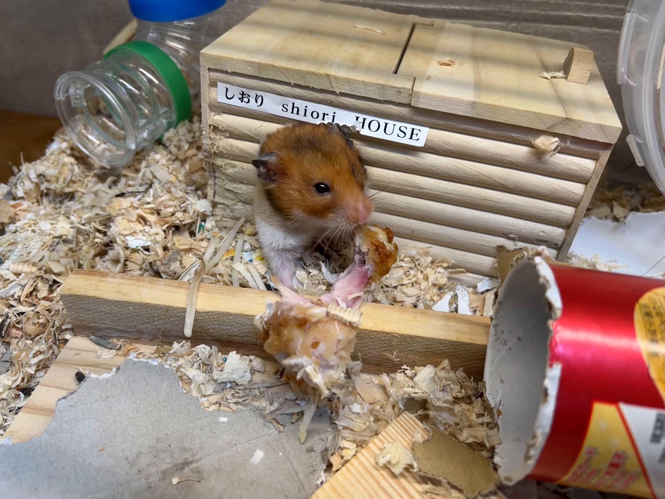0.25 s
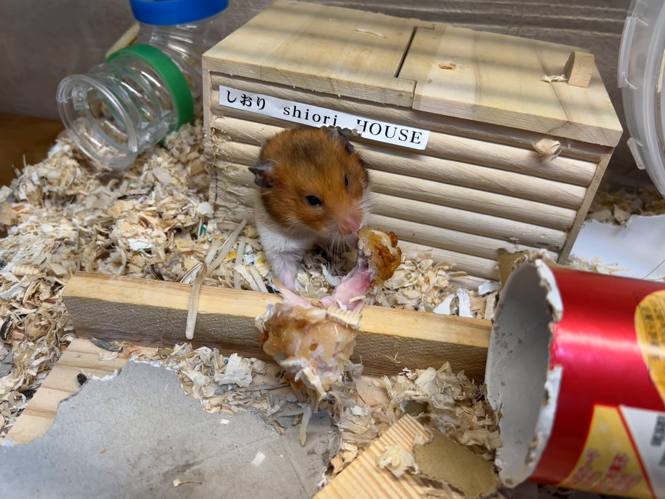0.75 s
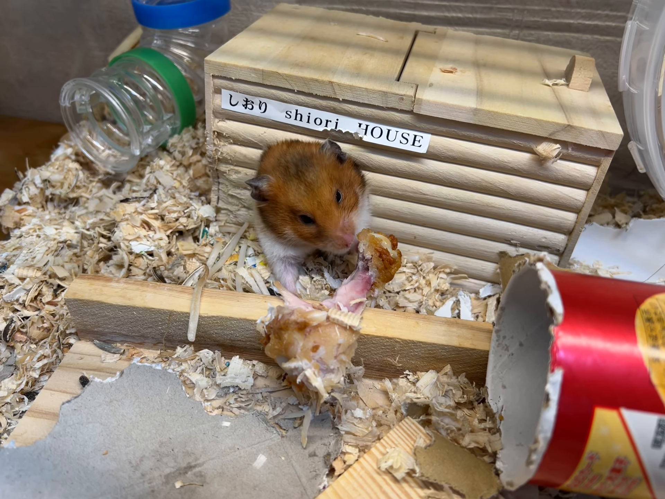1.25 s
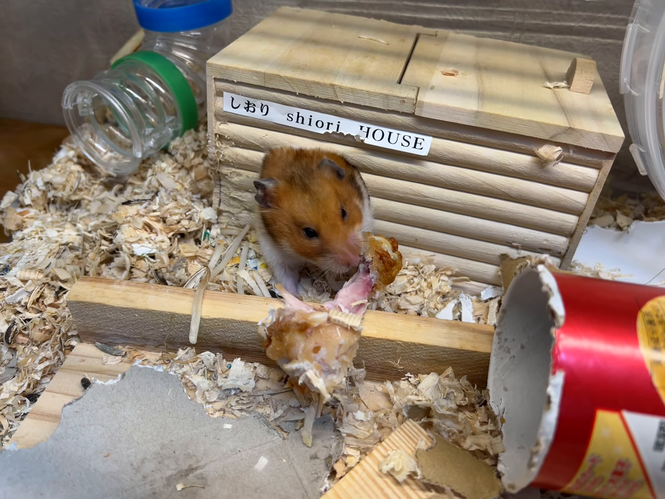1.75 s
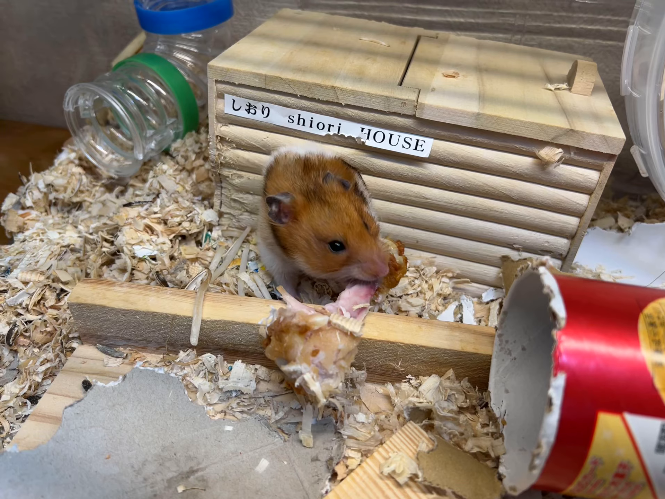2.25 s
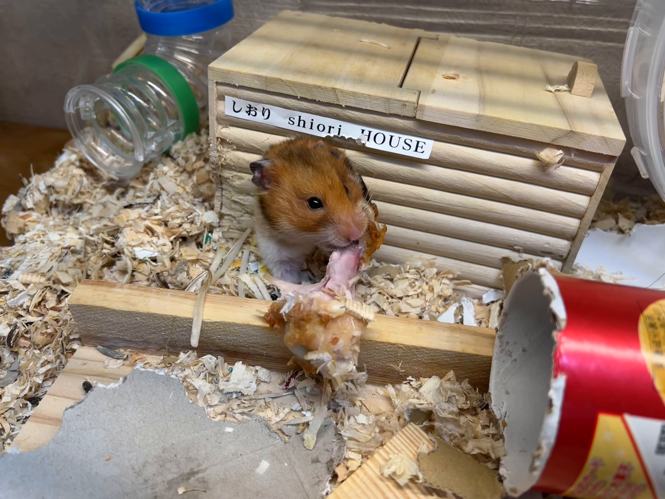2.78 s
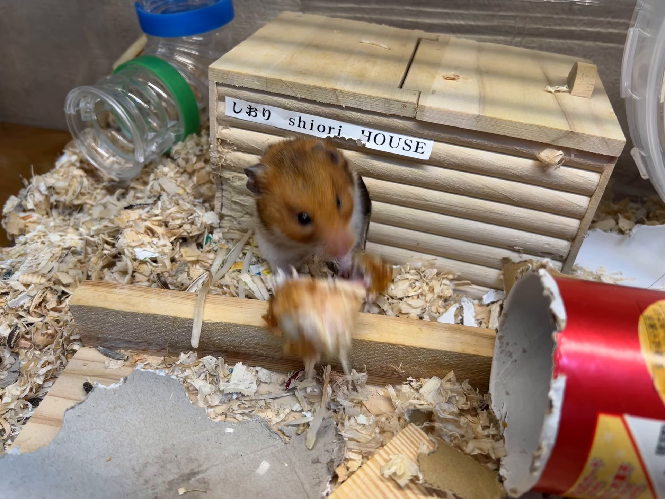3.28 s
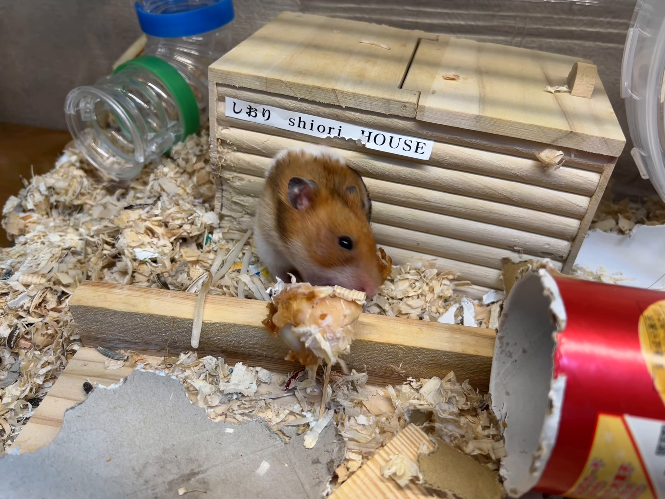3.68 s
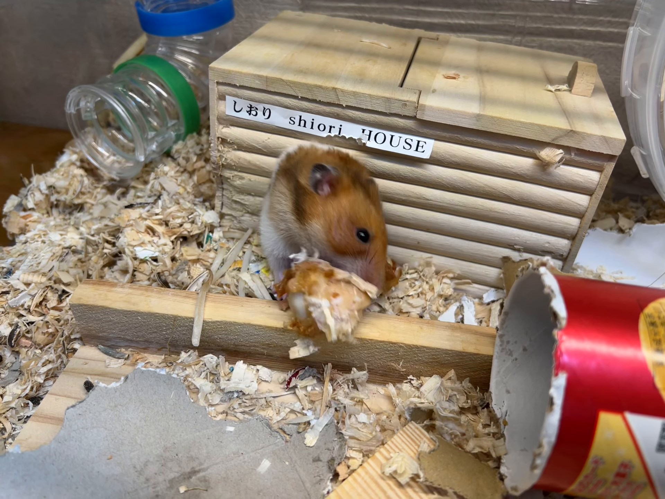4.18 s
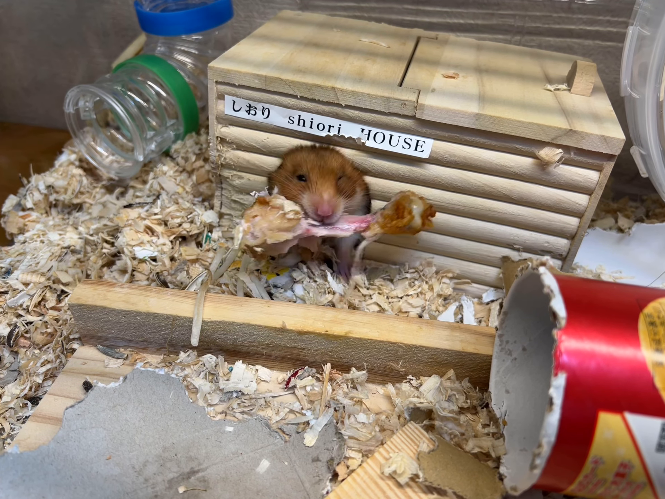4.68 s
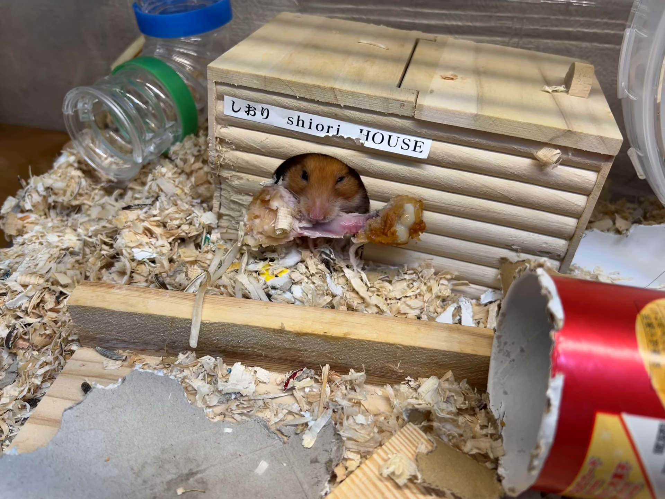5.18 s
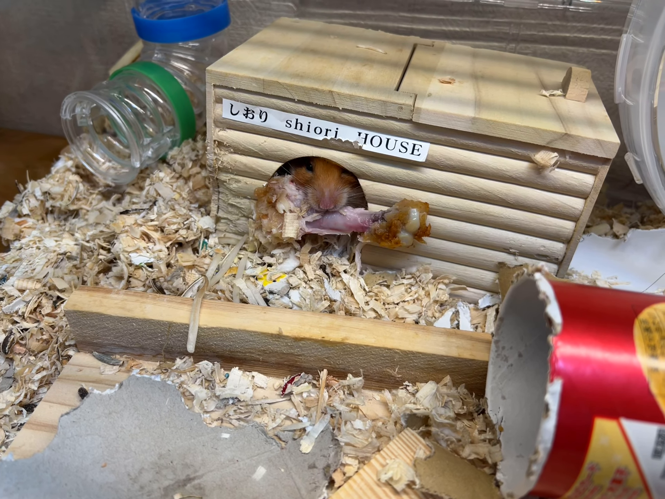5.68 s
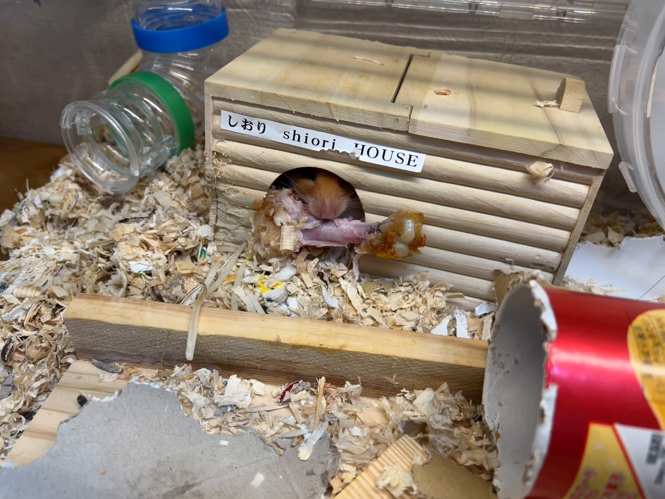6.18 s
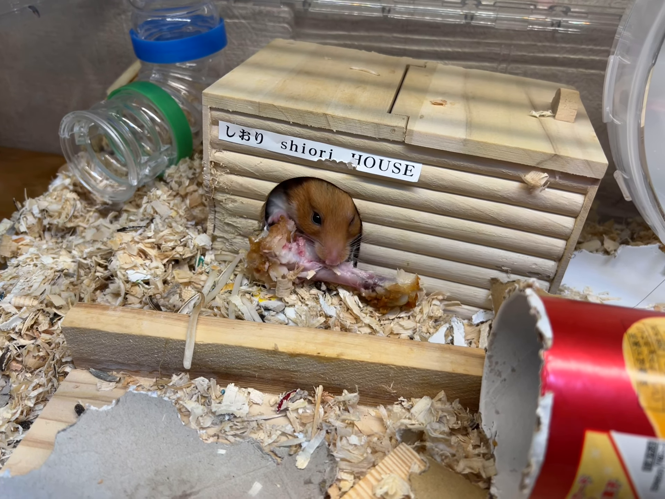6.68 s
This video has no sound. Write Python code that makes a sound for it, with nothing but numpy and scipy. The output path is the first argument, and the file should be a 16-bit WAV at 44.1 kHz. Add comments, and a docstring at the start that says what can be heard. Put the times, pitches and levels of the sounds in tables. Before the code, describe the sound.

A hamster's teeth tick faintly on a bone in a quiet room, then the bone is tugged, rasping and thumping through crackling wood shavings.

```python
"""A hamster nibbles a bone in its cage, then drags it through wood shavings into the door of its wooden house.
First, over a quiet rumbling room, teeth tick in short runs: sharp impulses with a splintering tail.
Then come the tugs: random tiny fractures make shavings crackle and the bone rasp and catch on wood,
while its heavy end thumps the hollow cage floor and knocks on wood, both built from decaying modes.
Near the end it squeaks on the door's rim and knocks again; the cage walls answer closely throughout."""
import sys
import numpy as np
from scipy import signal
from scipy.fft import rfft, irfft, next_fast_len
from scipy.io import wavfile
from scipy.ndimage import uniform_filter1d, map_coordinates

SR = 44100
rng = np.random.default_rng(int(sys.argv[2]) if len(sys.argv) > 2 else 0)


def to_wav(s):
    """Save 16-bit WAV."""
    ch = np.atleast_2d(s).T  # columns
    pcm = np.round(np.clip(ch, -1, 1) * 32767)  # PCM
    wavfile.write(sys.argv[1], SR, pcm.astype(np.int16))


N = 306054  # length of the scene in samples


def amp(db):
    """Decibels to gain."""
    return 10 ** (np.asarray(db) / 20)


def unit(x):
    """Scale to rms 1."""
    return x / np.sqrt(np.mean(x ** 2) + 1e-20)


def blow_unit(x):
    """Scale so that the first thirtieth of a second has rms 1."""
    return x / np.sqrt(np.mean(x[:SR // 30] ** 2) + 1e-20)


def peaked(x):
    """Scale to peak 1."""
    return x / (np.abs(x).max() + 1e-20)


def along(points, hz):
    """Read a curve of (Hz, value) points on a log frequency axis."""
    point_hz, values = np.transpose(points)
    return np.interp(np.log(hz + 1), np.log(point_hz), values)


def wobble(rate):
    """A smooth random curve with rate knots a second."""
    knots = rng.standard_normal(N // 20)
    return map_coordinates(knots, [np.arange(N) * rate / SR], mode="wrap")


def filtered(x, response):
    """Pass x through a response given as a function of frequency in Hz."""
    size = next_fast_len(len(x) + 8192)  # room for the filter's own ringing
    spectrum = rfft(x, size) * response(np.fft.rfftfreq(size, 1 / SR))
    return irfft(spectrum, size)[:len(x)]


def coloured(x, spectrum):
    """Tint x with a (Hz, dB) spectrum, at rms 1."""
    return unit(filtered(x, lambda hz: amp(along(spectrum, hz))))


def resonance(hz, centre, width):
    """Causal response of one damped mode."""
    return 1j * hz * width / (centre ** 2 - hz ** 2 + 1j * hz * width)


MODE_SCATTER_DB = 1.5  # spread of each mode's strength from blow to blow


def ring(modes, t):
    """Struck modes are decaying sines, at slightly new strengths for each blow."""
    total = np.zeros(len(t))
    for hz, db, t60 in modes:
        level_db = db + MODE_SCATTER_DB * rng.standard_normal()
        total += amp(level_db - 60 * t / t60) * np.sin(2 * np.pi * hz * t)
    return total


def grains(size, rate, spread_db):
    """Random tiny fractures, rate a second and of uneven strength, at rms 1."""
    hit = rng.random(size) < rate / SR
    sign = rng.choice([-1, 1], size)
    strength = amp(spread_db * np.clip(rng.standard_normal(size), -2, 2))
    return unit(hit * sign * strength)


def patchy(x, patchy_db):
    """Every chip and contact spot has its own colour: random gains over small patches of pitch and time."""
    z = signal.stft(x, nperseg=256)[2]
    field = uniform_filter1d(rng.standard_normal(z.shape), size=4, axis=0)
    field = uniform_filter1d(field, size=7, axis=1)
    shaded = signal.istft(z * amp(patchy_db * unit(field)), nperseg=256)[1]
    return unit(shaded[:len(x)])


def add(track, s, sound):
    """Mix a sound in at time s."""
    part = track[round(s * SR):][:len(sound)]
    part += sound[:len(part)]


# low rumble of room and cage floor: (f/Hz, level/dB)
RUMBLE_SPECTRUM = [(30, -8), (55, 0), (78, 1), (110, -5), (170, -3), (230, -16.5), (330, -22), (700, -77)]
# faint hiss of the room: (f/Hz, level/dB)
HISS_SPECTRUM = [(160, -18.5), (280, -7.5), (420, -8.5), (520, -10.5), (1050, -16.5), (1900, -17.5),
                 (7000, -29), (16000, -36)]


def room_tone():
    """A low, lumpy rumble and a faint hiss, both shaped noise."""
    lumps = amp(3.2 * np.tanh(wobble(rate=20)))
    rumble = amp(-65.0) * lumps * coloured(rng.standard_normal(N), RUMBLE_SPECTRUM)
    hiss = amp(-78.5) * coloured(rng.standard_normal(N), HISS_SPECTRUM)
    return rumble + hiss


# how long the room's tail lasts: (f/Hz, t60/s)
ROOM_DECAY = [(150, 0.41), (800, 0.17), (3000, 0.099), (14000, 0.2)]


def reflections(x, near_db, near_s, room_db):
    """Dense echoes from the cage walls, and the small room's tail, which fades at its own pace per pitch."""
    hz, t, z = signal.stft(rng.standard_normal(SR // 2), SR, nperseg=256)
    fade = amp(-60 * t / along(ROOM_DECAY, hz)[:, None])
    tail = signal.istft(z * fade, SR, nperseg=256)[1]
    t = np.arange(len(tail)) / SR
    walls = grains(len(t), rate=2000, spread_db=0.0) * np.exp(-t / near_s)
    walls = walls * (t > .002)  # the wall echoes begin after 2 ms
    response = amp(near_db) * walls / np.linalg.norm(walls)
    response = response + amp(room_db) * tail / np.linalg.norm(tail)
    return signal.fftconvolve(x, response)[:N]


# background stirring of the shavings, rising and falling, mostly stronger once the dragging begins: (t/s, level/dB)
STIRRING = [(0, -89.5), (2.15, -91.5), (2.45, -75), (3.2, -85), (4.3, -81.5), (4.7, -73.5), (5.5, -73),
            (5.85, -76), (6.6, -74), (6.94, -74)]
STIR_RASP_DB = -1.5  # rasp on wood over the shavings
# shoves and tugs of the bone: (t/s, length/s, shavings level/dB, rasp on wood over the shavings level/dB)
BONE_TUGS = [(0.008, 0.061, -71.5, -23), (2.515, 0.11, -67.5, -21), (2.594, 0.12, -66.5, 5),
             (2.717, 0.15, -64, 4), (2.933, 0.15, -68.5, 3), (3.235, 0.17, -71.5, -17),
             (3.299, 0.029, -63.5, -20), (3.57, 0.086, -76, -16), (3.72, 0.059, -71, -13),
             (3.894, 0.041, -70, -4), (4.106, 0.023, -58.5, 2), (4.288, 0.074, -78.5, 8),
             (4.431, 0.091, -66.5, 2), (4.48, 0.34, -68, -7), (4.674, 0.092, -62.5, 4.5),
             (4.898, 0.07, -65.5, 3), (4.965, 0.134, -67, 5.5), (5.101, 0.045, -64.5, 10),
             (5.231, 0.11, -65.5, 6), (5.365, 0.048, -66, 2.5), (5.5, 0.1, -76.5, 4),
             (5.584, 0.036, -63.5, 6.5), (5.979, 0.07, -65.5, 6), (6.127, 0.026, -67, 0.5),
             (6.25, 0.072, -68, 6.5), (6.347, 0.082, -64, -2), (6.463, 0.076, -70.5, -11),
             (6.831, 0.072, -66, 10.5)]
TUG_ATTACK_S, TUG_RELEASE_S = 0.037, 0.027


def bed_motion():
    """Gains of rustle and rasp: each tug swells, holds and dies away, adding its power to the stirring."""
    t = np.arange(N) / SR
    shavings_power = amp(np.interp(t, *np.transpose(STIRRING))) ** 2
    rasp_power = shavings_power * amp(STIR_RASP_DB) ** 2
    for s, length, db, wood_db in BONE_TUGS:
        swell = np.clip((t - s) / TUG_ATTACK_S, 0, 1)
        release = np.exp(-np.clip(t - s - length, 0, 1) / TUG_RELEASE_S)
        push = amp(db) * swell * release
        shavings_power = shavings_power + push ** 2
        rasp_power = rasp_power + (amp(wood_db) * push) ** 2
    return np.sqrt(shavings_power), np.sqrt(rasp_power)


def cage_rumble(rasp_gain):
    """Shifting weight makes the cage floor murmur in lumps while the bone is dragged."""
    lumps = amp(3.5 * np.tanh(wobble(rate=22)))
    murmur = unit(lumps * coloured(rng.standard_normal(N), RUMBLE_SPECTRUM))
    return amp(-25.5) * np.sqrt(rasp_gain) * murmur


# a paw taps the wall of the house: time, peak level, pitch, rise time
TAP_S, TAP_DB, TAP_HZ, TAP_RISE_S = 0.97, -56, 320, 0.006


def tap():
    """A padded touch: a few cycles that swell and are damped at once."""
    t = np.maximum(np.arange(N) / SR - TAP_S, 0)
    u = (t / TAP_RISE_S) ** 2
    return amp(TAP_DB) * peaked(u * np.exp(-u) * np.sin(2 * np.pi * TAP_HZ * t))


def chewing():
    """Faint moist crackles in the mouth come and go: uneven grains through a bright resonance."""
    crackle = grains(N, rate=580, spread_db=5.5) * amp(7.8 * np.tanh(wobble(rate=33)))
    return amp(-91.0) * unit(filtered(crackle, lambda hz: resonance(hz, 5870, 4200) ** 2))


# incisors snapping off a fibre: (t/s, peak level/dB, centre f/Hz)
TOOTH_SNAPS = [(0.082, -52, 12900), (0.2362, -60, 6240), (0.815, -52.5, 10800), (1.097, -62, 12800),
               (1.371, -55, 13100), (1.9098, -46.5, 8800), (2.373, -42.5, 13600), (3.09, -51.5, 15300),
               (4.128, -44, 9900), (6.288, -46, 8700)]
# lighter bites in short runs: (t/s)
NIBBLE_TIMES = [0.395, 0.482, 0.569, 0.667, 0.854, 0.941, 1.587, 1.681]
NIBBLE_DB, NIBBLE_SCATTER_DB, NIBBLE_HZ = -66.5, 2, 12000  # peak level, its spread, centre


def teeth():
    """Each snap is one sharp impulse, chased by a few milliseconds of splintering."""
    track, t = np.zeros(N), np.arange(SR // 20) / SR
    nibbles = [(s, NIBBLE_DB + NIBBLE_SCATTER_DB * rng.standard_normal(), NIBBLE_HZ) for s in NIBBLE_TIMES]
    for s, db, centre_hz in [*TOOTH_SNAPS, *nibbles]:
        snap = 1.3 * rng.standard_normal(len(t)) * np.exp(-t / 0.0034)
        snap[0] = 1
        # a broad peak over a little unfiltered click
        snap = filtered(snap, lambda hz: resonance(hz, centre_hz, 10000) ** 2 + 0.0079)
        add(track, s, amp(db) * peaked(snap))
    return track


# weight landing on the cage floor: (t/s, level/dB, centre of the push f/Hz)
FLOOR_THUMPS = [(0.195, -48, 130), (0.99, -61.5, 169), (2.138, -49, 99), (2.288, -45, 133),
                (2.525, -51, 94), (3.283, -21.5, 135), (3.331, -41.5, 222), (3.738, -45.5, 119),
                (3.962, -35.5, 70), (4.132, -36, 97.5), (4.686, -57, 120), (6.754, -52.5, 145),
                (6.877, -37, 74), (6.898, -36.5, 160)]
# hollow cage floor, relaxed and before any foot damps it: (f/Hz, level/dB, t60/s)
CAGE_FLOOR_MODES = [(66.5, -2, 0.32), (84.45, -13.5, 0.72), (106.1, 3.5, 0.15), (123.4, -7.5, 0.63),
                    (133.2, 13.5, 0.059), (154.4, 6, 0.2), (198.2, -6.5, 0.18), (247, -9.5, 0.066),
                    (293, -9.5, 0.16)]
# a light step stays down and damps the floor, a heavy blow lets it ring
STEP_DB, STEP_DAMPING_PER_S, DAMPING_HALVES_DB = -47.5, 5.2, 10  # damping halves every 10 dB louder
# the load stiffens the floor at first (a share of pitch), so its pitch sinks as it relaxes
STIFFENING, RELAX_S = 0.031, 0.12
# the floor's crowded upper modes
SHUDDER_DB, SHUDDER_HZ, SHUDDER_T60_S = -8.5, 218, 0.34


def thumps():
    """Soft, heavy contacts swell into the low modes of the cage floor; a foot left standing there damps them."""
    track, t = np.zeros(N), np.arange(SR) / SR
    sinking = t + STIFFENING * RELAX_S * (1 - np.exp(-t / RELAX_S))  # time runs fast at first
    for s, db, push_hz in FLOOR_THUMPS:
        damping = STEP_DAMPING_PER_S * .5 ** ((db - STEP_DB) / DAMPING_HALVES_DB)
        noise = rng.standard_normal(len(t))
        shudder = unit(filtered(noise, lambda hz: resonance(hz, SHUDDER_HZ, SHUDDER_HZ) ** 2))
        boom = ring(CAGE_FLOOR_MODES, sinking)
        boom = boom + shudder * amp(SHUDDER_DB - 60 * t / SHUDDER_T60_S)
        boom = boom * (1 - np.exp(-(t / 0.006) ** 2)) * np.exp(-damping * t)
        # a padded step barely reaches the upper modes
        softness = 2 + damping / (damping + STEP_DAMPING_PER_S)
        boom = filtered(boom, lambda hz: resonance(hz, push_hz, 1.54 * push_hz) ** softness)
        add(track, s, amp(db) * blow_unit(boom))
    return track


# the bone striking wood: (t/s, body level/dB, hardness f/Hz)
WOOD_KNOCKS = [(3.276, -41.5, 750), (3.945, -56.5, 1210), (3.9541, -37, 4760), (4.329, -62.5, 550),
               (4.688, -56.5, 630), (6.601, -66, 350), (6.869, -44.5, 2830), (6.903, -53.5, 9000),
               (6.925, -56, 5000)]
# wood under the bone: (f/Hz, level/dB, t60/s)
STRUCK_WOOD_MODES = [(306.6, -1.5, 0.13), (437, -3, 0.22), (491, 10, 0.038), (616, 6.5, 0.023),
                     (917, 1.5, 0.12), (960, 5, 0.027), (1060, -2.5, 0.097), (1152, -2.5, 0.1),
                     (1270, -1, 0.12), (1566, -3, 0.12), (2234, 0.5, 0.062)]
# dense clatter of the blow: (f/Hz, level/dB)
CLATTER_SPECTRUM = [(100, -14.5), (330, 6), (520, 7.5), (750, 2.5), (1200, -8), (1700, -8.5), (3100, -3),
                    (6000, -49.5), (16000, -8)]
# low panel modes that outlast the high ones: (f/Hz, level/dB)
PANEL_SPECTRUM = [(150, -22), (450, 2), (950, -2.5), (1450, -18), (4000, -27)]


def knocks():
    """Bone on wood: a crack, a dense clatter and modes; a soft contact passes little but the lows."""
    track, t = np.zeros(N), np.arange(SR // 2) / SR
    for s, db, hard_hz in WOOD_KNOCKS:
        noise = coloured(rng.standard_normal(len(t)), CLATTER_SPECTRUM)
        low_clatter = coloured(rng.standard_normal(len(t)), PANEL_SPECTRUM)
        blow = ring(STRUCK_WOOD_MODES, t) * (1 - np.exp(-t / 0.00094))
        blow = blow + 4.7 * noise * np.exp(-t / 0.01)
        blow = blow + 0.58 * low_clatter * np.exp(-t / 0.049)
        body = blow_unit(filtered(blow, lambda hz: 1 / (1 + 1j * hz / hard_hz) ** 4))
        crack = unit(filtered(noise, lambda hz: resonance(hz, 3570, 4100) ** 2)) * np.exp(-t / 0.0046)
        crack_share = 1.55 * hard_hz / (hard_hz + 4000)  # harder contacts crack more
        add(track, s, amp(db) * (body + crack_share * crack))
    return track


# the bone squeaking on the door's rim: (t/s, peak level/dB, length/s)
RIM_SQUEAKS = [(6.14, -50.5, 0.037), (6.183, -51.5, 0.0097)]


def squeaks():
    """Brief, rough stick-slip of the bone, slowing as it goes; a resonance lifts its third harmonic."""
    track, t = np.zeros(N), np.arange(SR // 10) / SR
    for s, db, length in RIM_SQUEAKS:
        roughness = 1 + .45 * rng.standard_normal(len(t))
        cycles = np.cumsum((1125 - 1000 * t) * roughness) / SR  # slip rate in Hz, falling
        slips = np.diff(np.floor(cycles), prepend=0)  # one impulse a cycle
        slips = slips * np.sin(np.pi * np.minimum(t / length, 1))
        tone = filtered(slips, lambda hz: resonance(hz, 3020, 280) + 0.5 * resonance(hz, 1460, 780))
        add(track, s, amp(db) * peaked(tone))
    return track


# resonances of the rubbed bone and house: (f/Hz, width/Hz, level/dB)
RUBBED_BODY_MODES = [(406.7, 32, 8), (758, 163, 1.5), (1042, 140, -10), (1544, 184, -2.5), (2312, 170, -3),
                     (3060, 186, -8.5), (3620, 460, -12.5), (4590, 430, -17)]
# dry broad grain of the rubbing: (f/Hz, level/dB)
GRAIN_SPECTRUM = [(100, -4), (350, -3), (1200, -20.5), (3000, -34), (7000, -50), (16000, -28)]


def rubbed(slips):
    """Slips ring the bone and the house, over a dry broad grain."""
    body = filtered(slips, lambda hz: sum(amp(db) * resonance(hz, c, w) for c, w, db in RUBBED_BODY_MODES))
    return unit(body) + coloured(slips, GRAIN_SPECTRUM)


# the bone catching and slipping: (t/s, level/dB, pitch f/Hz)
BONE_CATCHES = [(0.342, -74, 4480), (2.658, -46, 3900), (2.760, -46.5, 4280), (2.772, -50.5, 910),
                (2.812, -44.5, 10900), (2.8215, -47, 1090), (2.852, -49, 3200), (2.859, -42.5, 980),
                (2.860, -48.5, 5360), (2.937, -61, 800), (3.066, -58, 2150), (3.679, -67.5, 7100),
                (3.713, -66.5, 6350), (3.770, -62.5, 700), (3.941, -55, 11900), (4.992, -62, 1450),
                (5.139, -48.5, 2350), (5.222, -58.5, 2400), (5.311, -55.5, 714), (5.340, -49.5, 2580),
                (5.408, -49.5, 2500), (5.563, -60.5, 1150), (5.368, -60, 2400), (5.979, -60.5, 1330),
                (6.004, -55, 1190), (6.224, -57.5, 940), (6.226, -58, 5700), (6.403, -58.5, 1190)]
CRUNCH_S = 0.0049  # nominal length of one run of slips, over which its level is reckoned


def crunches():
    """The bone sticks, then lets go in a short run of slips; each contact rings at its own pitch."""
    track, t = np.zeros(N), np.arange(SR // 10) / SR
    u = t / (CRUNCH_S / 2)
    for s, db, pitch_hz in BONE_CATCHES:
        burst = rubbed(grains(len(t), rate=4600, spread_db=-0.5) * u * np.exp(-u))

        def contact(hz):
            """A broad and a narrow peak at the contact's pitch; the house panel takes a low share."""
            broad = resonance(hz, pitch_hz, 1.7 * pitch_hz) ** 2
            narrow = 0.62 * resonance(hz, pitch_hz, pitch_hz / 10)
            return broad + narrow + 0.51 * resonance(hz, 410, 185)

        add(track, s, amp(db) * unit(filtered(burst, contact)) * np.sqrt(CRUNCH_S / t[-1]))
    return track


TOP_HZ = 15800  # highest frequency rendered
CHIPS_PER_S, CHIP_WIDTH = 28, 0.35  # snaps a second at each pitch, bandwidth as a share of the pitch


def chips(count):
    """Single shavings snap, each at the pitch of its own size."""
    total = np.zeros(N)
    for pitch_hz in np.geomspace(1000, TOP_HZ, count):
        snaps = grains(N, rate=CHIPS_PER_S, spread_db=1)
        total += filtered(snaps, lambda hz: resonance(hz, pitch_hz, CHIP_WIDTH * pitch_hz))
    return unit(total)


# colour of the rustling shavings: (f/Hz, level/dB)
SHAVINGS_SPECTRUM = [(150, -44), (600, 0), (2000, 0), (5000, -3), (7400, -0.5), (9600, -5), (11000, 1.5),
                     (13000, -5), (16000, -6.5)]
CHIP_DB = -9  # single snaps over the crackle before it clumps


def bedding(gain):
    """Shavings rustle in clumps and snap one by one as the animal and the bone push through them."""
    crackle = grains(N, rate=3500, spread_db=0.0) * amp(2.7 * wobble(rate=63))
    rustle = coloured(crackle + amp(CHIP_DB) * chips(count=12), SHAVINGS_SPECTRUM)
    return gain * patchy(rustle, patchy_db=2.0)


def dragging(gain):
    """The bone rasps along wood in short scrapes of uneven slips, sticking in between."""
    slips = grains(N, rate=1200, spread_db=2.5) * amp(2.1 * wobble(rate=75))
    scrapes = amp(4 * np.tanh(1.5 * wobble(rate=60)))
    return gain * patchy(rubbed(slips * scrapes), patchy_db=2.0)


def scene():
    """Everything in the cage, the echoes of the close sounds and the room."""
    rustle, rasp = bed_motion()
    mouth = teeth() + chewing()
    bone = crunches() + squeaks() + knocks() + dragging(rasp)
    close = mouth + bone + bedding(rustle)
    echoes = reflections(close, near_db=-13.0, near_s=0.0022, room_db=-9.5)
    return (close + echoes + thumps() + tap() + cage_rumble(rasp) + room_tone())[None]


LOW_CUT_HZ = 51.6


def record(dry):
    """The microphone sheds the deepest bass; the rendering stops at TOP_HZ."""
    return filtered(dry[0], lambda hz: (hz < TOP_HZ) / np.sqrt(1 + (LOW_CUT_HZ / (hz + 1)) ** 10))[None]


dry = scene()
out = record(dry)
to_wav(out)
```